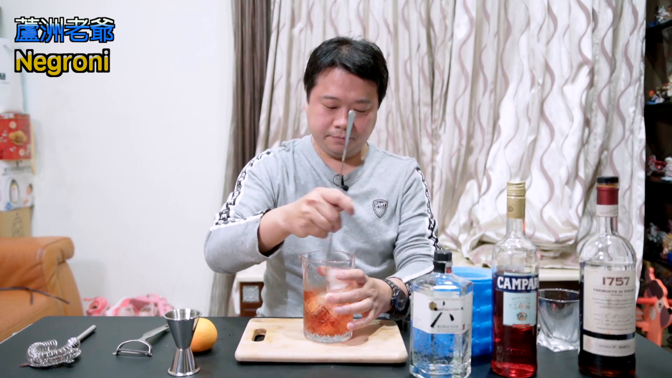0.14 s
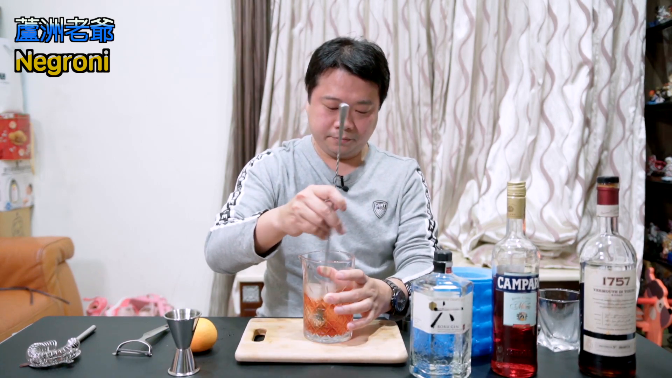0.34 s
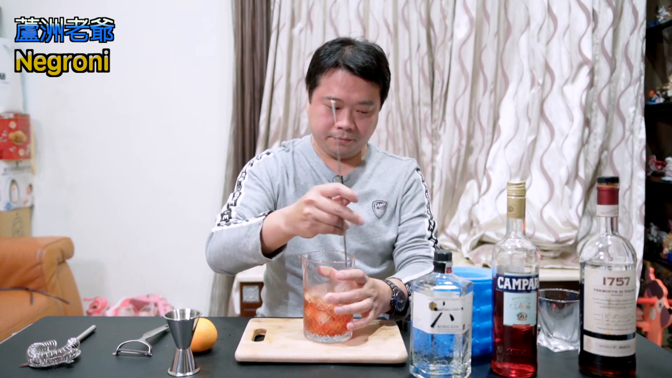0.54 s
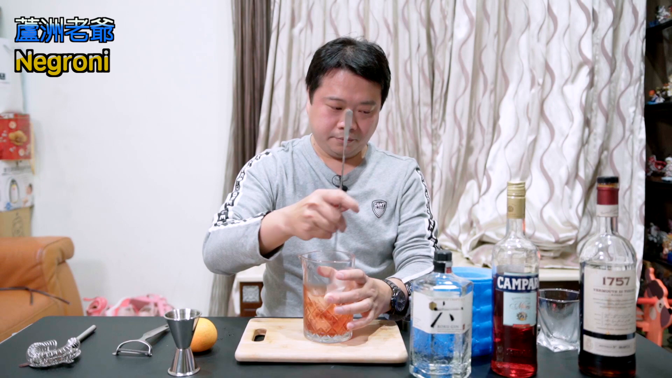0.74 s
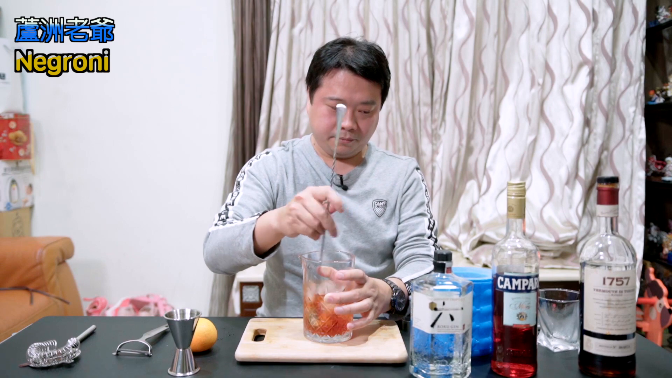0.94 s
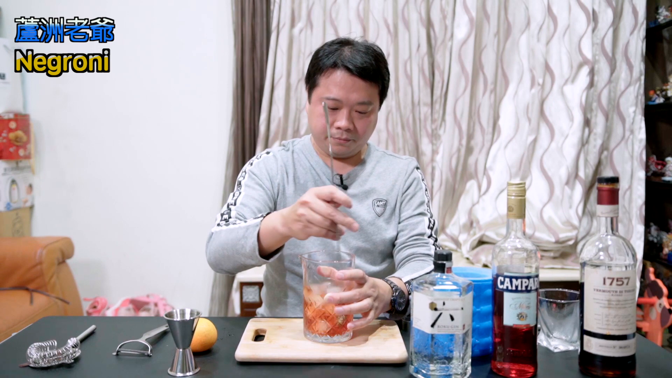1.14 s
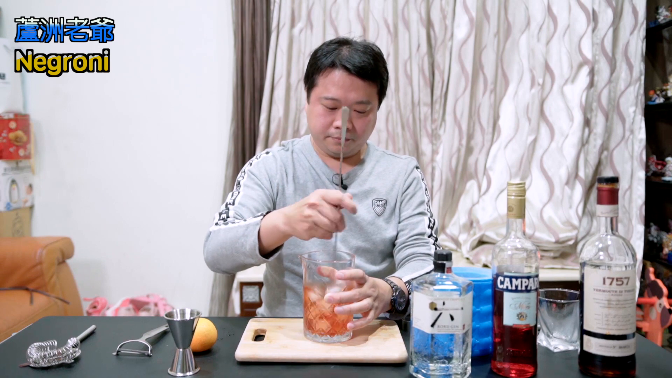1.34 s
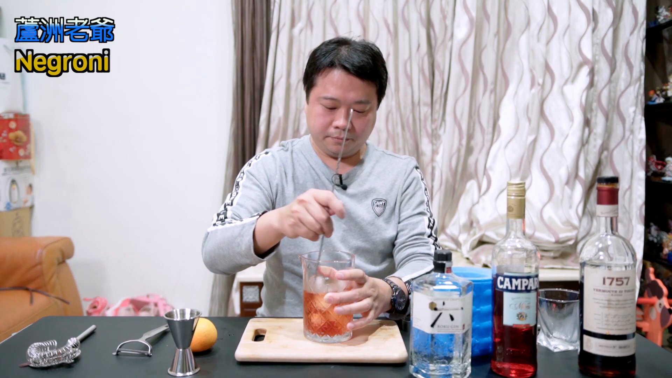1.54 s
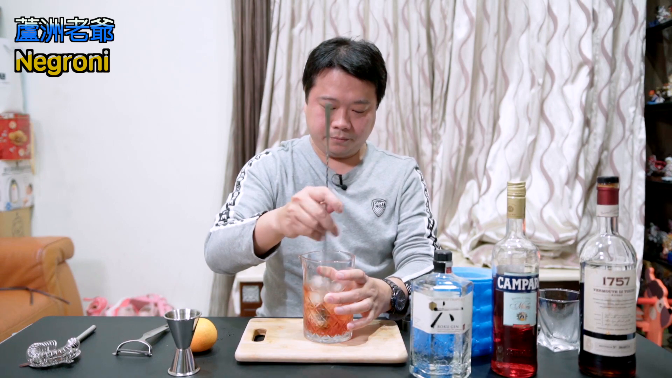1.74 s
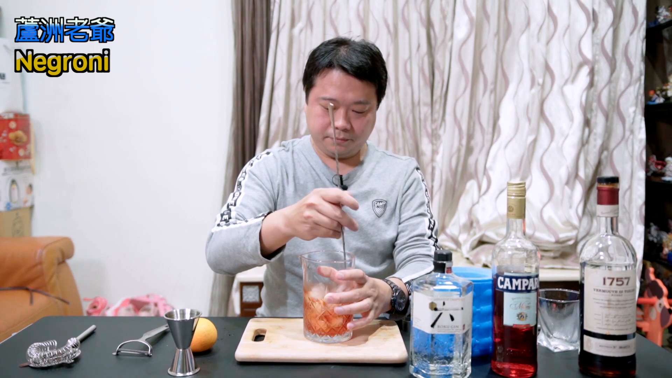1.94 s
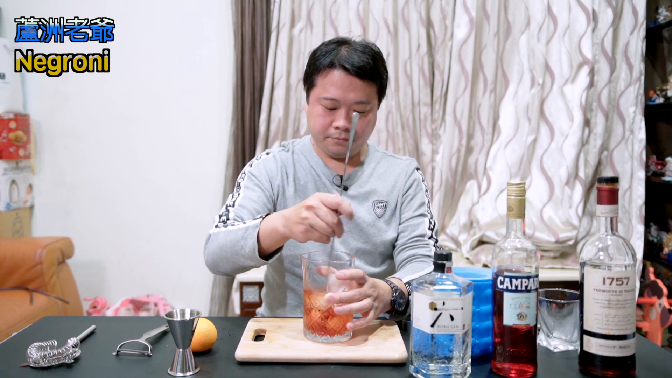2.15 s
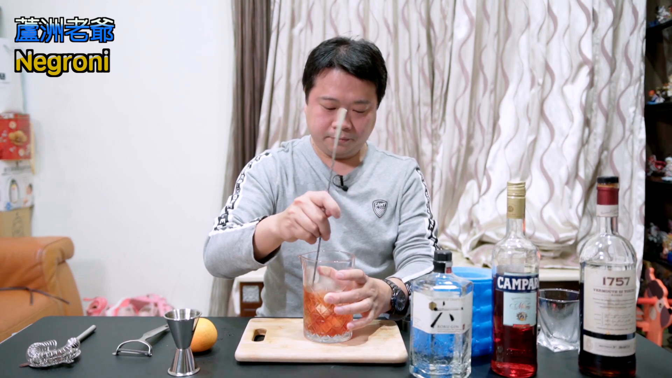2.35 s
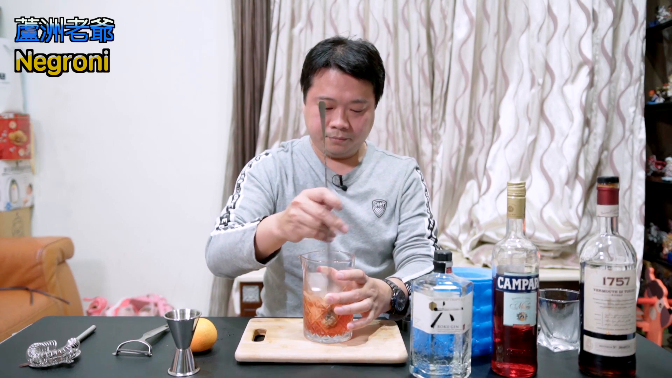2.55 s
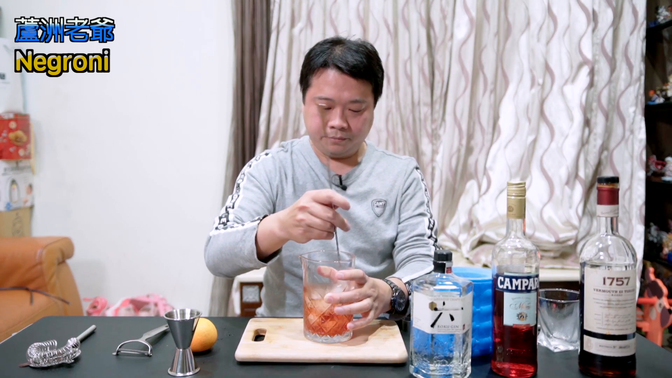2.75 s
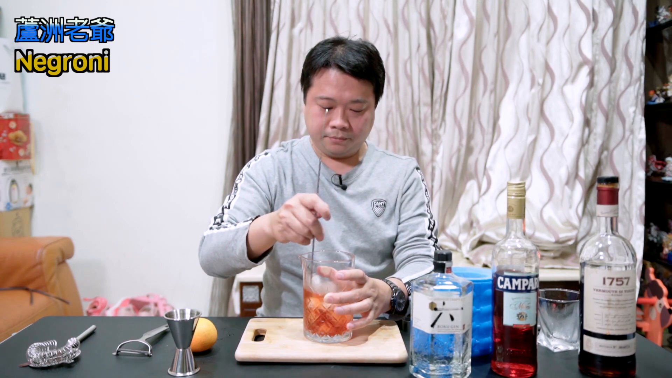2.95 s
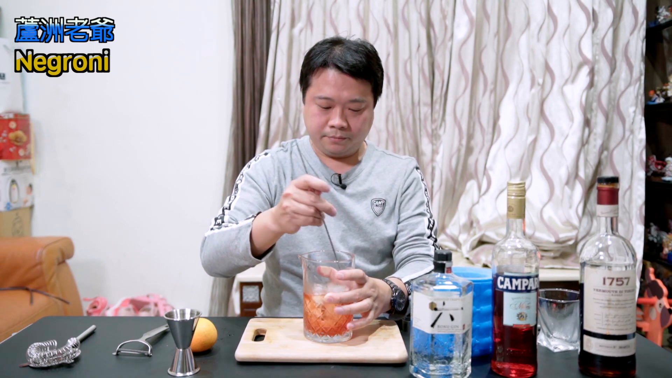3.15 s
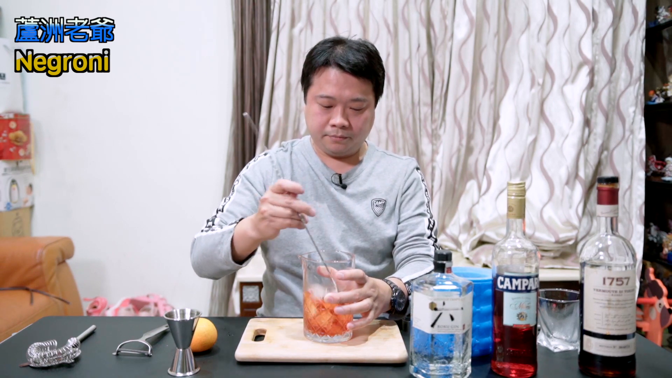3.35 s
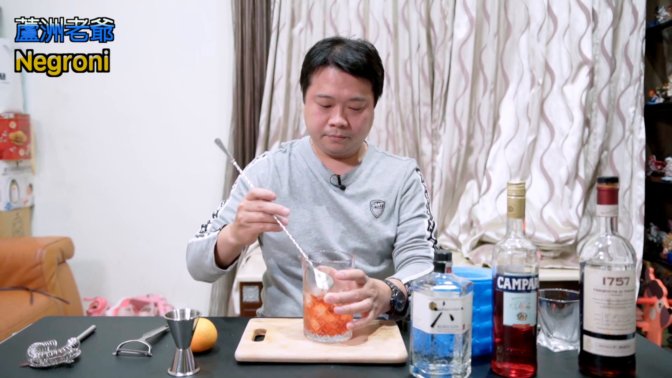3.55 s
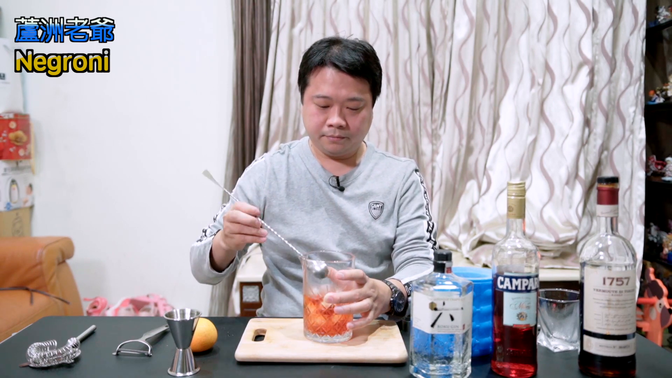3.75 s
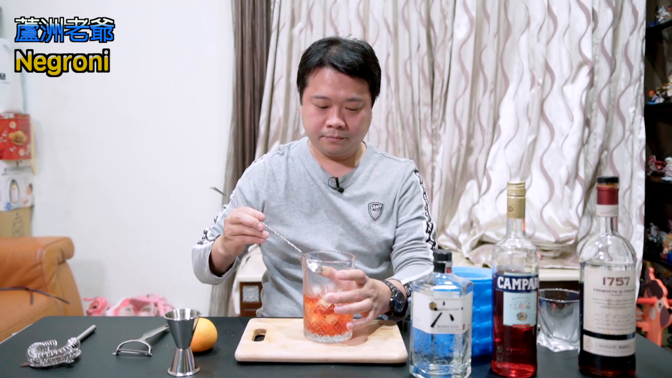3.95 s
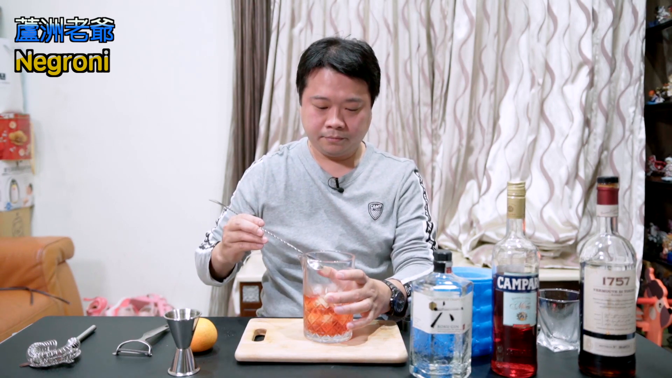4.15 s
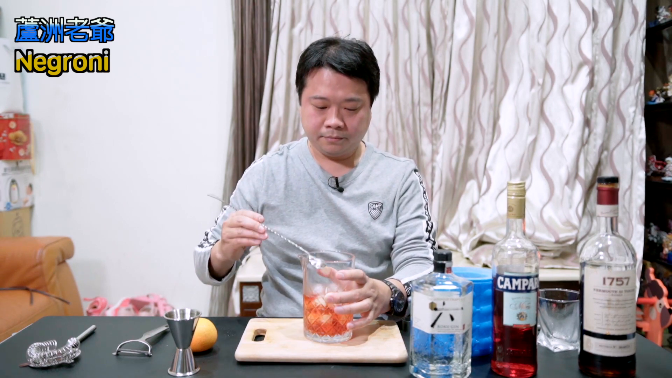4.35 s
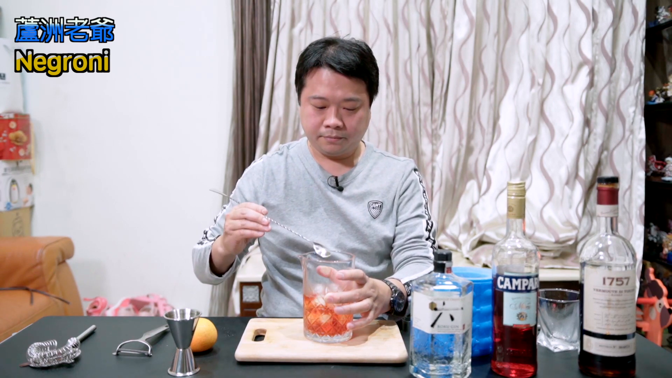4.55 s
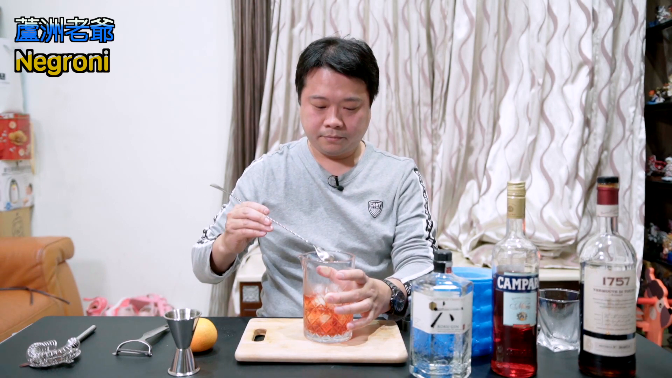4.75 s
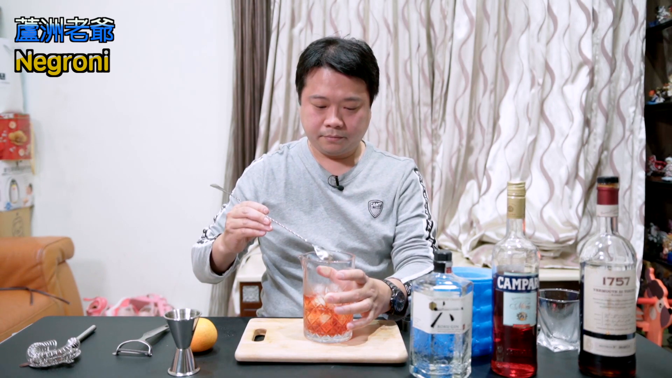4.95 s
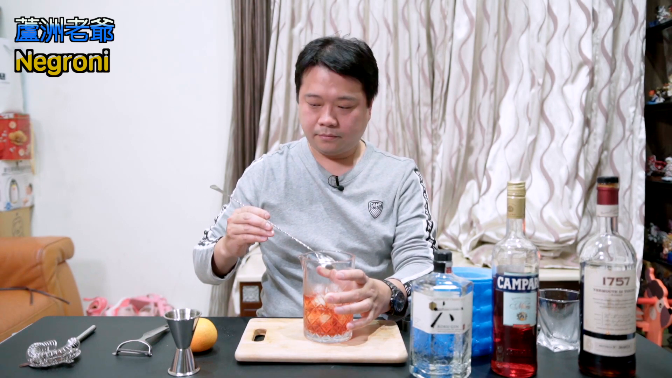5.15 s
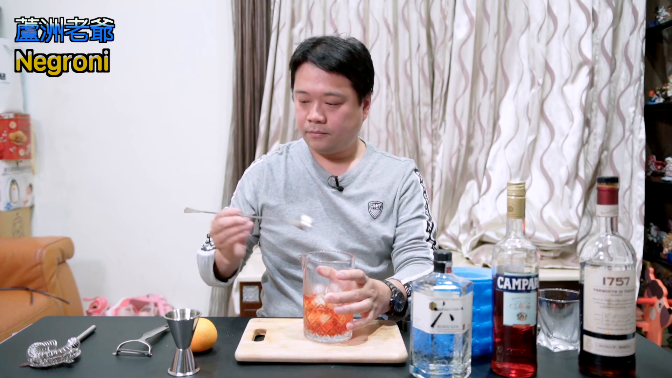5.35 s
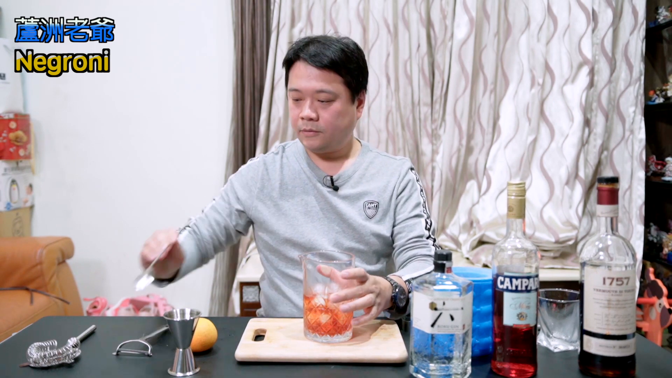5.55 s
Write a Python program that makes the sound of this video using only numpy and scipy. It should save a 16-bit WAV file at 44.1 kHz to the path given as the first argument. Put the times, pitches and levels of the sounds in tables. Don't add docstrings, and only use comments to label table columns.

```python
import sys
import numpy as np
from scipy import signal
from scipy.fft import rfft, irfft
from scipy.io import wavfile
from scipy.ndimage import uniform_filter1d

SR = 44100
rng = np.random.default_rng(int(sys.argv[2]) if len(sys.argv) > 2 else 0)


def amp(db):
    return 10 ** (np.asarray(db, float) / 20)


def write(x):
    x = np.atleast_2d(x).T
    wavfile.write(sys.argv[1], SR, np.round(np.clip(x, -1, 1) * 32767).astype(np.int16))


N = 246210
T = np.arange(N) / SR
SPLIT, SPLIT_DEPTH = 0.012, 0.5


def level(x, db):
    return x * amp(db) / np.sqrt(np.mean(x ** 2))


def colour(x, points):
    hz, db = np.transpose(points)
    f = np.maximum(np.arange(len(x) // 2 + 1) * SR / len(x), 1)
    return irfft(rfft(x) * amp(np.interp(np.log(f), np.log(hz), db)), len(x))


def band(x, lo_hz, hi_hz):
    return signal.sosfilt(signal.butter(3, [lo_hz, hi_hz], "bandpass", fs=SR, output="sos"), x)


def add(out, s, sound):
    i = max(int(s * SR), 0)
    out[i:i + len(sound)] += sound[:len(out) - i]


def decay(t, t60):
    return np.exp(-np.log(1000) * t / t60)


def glide_tone(hz):
    return np.sin(2 * np.pi * np.cumsum(hz) / SR)


def ring(modes, scatter_db, detune, chance, size=4000):
    hz, db, t60 = np.array(modes, float).T[:, :, None]
    t = T[:size]
    shift, strength = chance[:2 * len(modes)].reshape(2, -1, 1)
    waves = np.sin(2 * np.pi * hz * (1 + detune * shift) * t) * decay(t, t60)
    throb = np.sin(2 * np.pi * SPLIT * hz * (1 + 0.15 * strength) * t + 2 * shift)
    waves = waves * (1 + SPLIT_DEPTH * throb)
    return (amp(db + scatter_db * strength) * waves).sum(axis=0)


def crack(decay_s):
    return rng.standard_normal(4000) * np.exp(-T[:4000] / decay_s)


# (f/Hz, level/dB)
AIR_SPECTRUM = [(18, -39.5), (30, -5), (345, -7), (426, -13), (988, -16.5), (2400, -29), (12000, -37.5),
                (16000, -49)]


def air():
    steps = np.repeat(rng.standard_normal(N // 4000 + 1), 4000)[:N]
    drift_db = 1.1 * uniform_filter1d(steps, size=4000)
    hush = level(colour(rng.standard_normal(N), AIR_SPECTRUM), -66.5)
    whir = amp(-2) * band(hush, 2250, 2500)
    return (hush + whir) * amp(drift_db)


# (t/s, peak level/dB)
BUMPS = [(0.299, -69), (0.706, -61), (0.839, -65), (1.398, -76), (1.912, -53), (2.139, -58), (2.4, -53),
         (2.639, -49.5), (2.919, -53.5), (2.999, -62), (3.515, -51), (3.83, -56), (4.579, -66),
         (5.109, -66)]


def bumps():
    out = np.zeros(N)
    modes = [(46.3, -11.5, 0.05), (84.2, -3, 0.096), (149.5, -15, 0.15)]  # (f/Hz, level/dB, t60/s)
    swell = np.minimum(T[:4000] / 0.014, 1)
    for s, db in BUMPS:
        thump = ring(modes, 1.1, 0.08, rng.standard_normal(6))
        add(out, s, amp(db + 11.0) * thump * swell)
    return out


# (f/Hz, t60/s)
ROOM_T60 = [(300, 0.55), (2000, 0.35), (6000, 0.28), (15000, 0.16)]
# (delay t/s, level/dB)
ECHOES = [(.0023, -22.5), (.0065, -17), (0.013, -13.5), (0.027, -25)]


def room(x):
    t, tail = T[:20000], 0
    hz, t60 = np.transpose(ROOM_T60)
    for f in 180 * 2 ** np.arange(0, 6.6, 0.5):
        hiss = band(rng.standard_normal(len(t)), f / 1.19, f * 1.19)
        tail = tail + hiss * decay(t, np.interp(np.log(f), np.log(hz), t60))
    tail = tail * np.clip((t - 0.005) / 0.008, 0, 1)
    tail = amp(-10.5) * tail / np.sqrt(np.sum(tail ** 2))
    tail[0] = 1
    for late, db in ECHOES:
        tail[int(late * SR)] += amp(db)
    return signal.fftconvolve(x, tail)[:N]


# (t/s, low ring level/dB)
NUDGES = [(0.1175, -27.5), (0.147, -31), (0.2024, -37), (0.2563, -27.5), (0.279, -31), (0.404, -32),
          (0.555, -33), (0.9935, -39.5), (1.0324, -33), (1.0746, -52), (1.117, -31.5), (1.2792, -33),
          (1.3234, -30), (1.428, -51), (1.6304, -49), (1.741, -35), (1.787, -39), (2.113, -32.5),
          (2.1358, -32.5), (2.201, -30.5), (2.3893, -37), (2.9328, -25), (3.3873, -36)]


def nudges():
    return [(s, db, db - 28, db - 20.5, db - 20.5, db - 24, 0) for s, db in NUDGES]


# (t/s, cube level/dB, click level/dB, sharpness/dB: small cubes ring high, big ones thud)
CUBES = [(.1966, -31.5, -59, -4), (0.2075, -36, -46, -3), (.2559, -35, -62, 2), (.6085, -34, -48, 2),
         (.9928, -40.5, -71, -6), (1.0317, -36.5, -74, -5.5), (1.0742, -35.5, -50, -5.5),
         (1.1084, -49.5, -66, -18.5), (1.2005, -36.5, -50, -3), (1.2799, -35.5, -68, 0),
         (1.2901, -33.5, -76, -7), (1.3521, -34, -48.5, -4.5), (1.6315, -37.5, -53.5, -5),
         (1.6413, -35, -71, -0.5), (1.767, -40.5, -54, -2.5), (1.9184, -33.5, -50, -5.5),
         (1.949, -33.5, -44, 2), (2.1674, -30.5, -70, 5.5), (2.2359, -36, -50, 0), (2.3802, -37, -68, 11),
         (2.3994, -29.5, -38, -2.5), (2.4245, -46, -53, 14), (2.4884, -34, -43, 1), (2.602, -42.5, -63, 13),
         (2.673, -37.5, -39.5, 8), (2.7656, -38.5, -78, 13), (2.854, -38.5, -70, 0),
         (2.919, -25, -32, -6.5), (0.4133, -31.5, -41, 13)]


def cube_hits():
    return [(s, db - 23, db, db - 46, db - 46, click, sharp) for s, db, click, sharp in CUBES]


# (t/s, cube level/dB, high rings level/dB, height 0 at waist to 1 near lip)
PINCHES = [(0.098, -32, -34.5, 0.22), (0.1145, -40, -25.5, 0.55), (0.2812, -51, -37.5, 0.27),
           (0.3672, -35, -39, 0.14), (.4107, -53, -33, 0.55), (0.5522, -39, -26, 0.6),
           (.653, -36, -29.5, 0.39), (0.8414, -38.5, -42, 0.71), (0.8666, -36.5, -34.5, 0.47),
           (1.3034, -37, -29, 0.69), (1.4172, -34.5, -29.5, 0.17), (1.781, -51, -39.5, 0.052),
           (1.826, -53, -31, 0.42), (1.838, -39, -39, 0), (1.9287, -41, -38, 0.74),
           (1.9363, -55, -31, 0.52), (1.977, -40, -33, 0.2), (2.116, -49, -36.5, 1), (2.1299, -35, -33, 0),
           (2.1435, -35, -35, 0), (2.2229, -41, -34, 0.39), (2.3617, -31.5, -35, 0.36),
           (2.4579, -35.5, -50, 0.79), (2.4989, -30, -29, 0.57), (2.544, -32, -37, 0.6),
           (2.5624, -32.5, -42, 0.72), (3.156, -45.5, -45, 0.078), (3.256, -44, -33.5, 0.46),
           (3.3285, -45, -40, 0.3), (3.3848, -44, -40.5, 0.75)]


def pinches():
    rows = []
    for s, ice, high, up in PINCHES:
        mid_db, upper_db = 20 * np.log10(np.clip([1 - up, up], 0.05, 1))
        rows.append((s, high - 20, ice, high + mid_db, high + upper_db, high - 10.5, -1.5))
    return rows


# (t/s, then level/dB of low ring, cube, high rings, click)
BLOWS = [(.0055, -30, -47, -42.5, -72), (0.1387, -25.5, -23.5, -24.5, -31), (0.4178, -54, -27, -36, -36.5),
         (.428, -35, -24.5, -25, -30.5), (.458, -32.5, -42, -25.5, -40), (0.521, -27.5, -32.5, -30, -38.5),
         (0.596, -25.5, -50, -33.5, -42), (0.722, -43, -26, -50.5, -37), (0.7784, -41, -31, -43, -52),
         (1.2605, -34, -37.5, -32.5, -44.5), (1.542, -31.5, -33, -37.5, -52),
         (1.5673, -32.5, -38.5, -52, -52), (1.8516, -26, -31.5, -36, -42.5), (1.8923, -45, -36, -65, -50),
         (2.1029, -36, -35.5, -42, -40), (2.3156, -35.5, -43, -40.5, -60), (2.4443, -32, -35, -31.5, -45),
         (2.5834, -39, -35.5, -45, -64), (2.6337, -35, -35, -41, -40.5),
         (2.644, -34.5, -23.5, -44.5, -29.5), (2.659, -39, -40, -34, -50), (2.752, -40, -28, -35, -48),
         (3.1036, -32, -47, -57, -54), (3.2475, -37, -33.5, -31.5, -35)]


def blows():
    return [(s, low, ice, high, high - 5.5, click, 0.38 * (high - low))
            for s, low, ice, high, click in BLOWS]


def contacts():
    return blows() + pinches() + cube_hits() + nudges()


def jostle():
    push = np.zeros(N)
    for s, *db, _ in contacts():
        push[int(s * SR)] += np.sum(amp(np.array(db)) ** 2)
    settle = np.exp(-T[:12000] / 0.01) + amp(-30.0) * np.exp(-T[:12000] / 0.058)
    return np.abs(signal.fftconvolve(push, settle)[:N]) ** 0.37


def fizz():
    per_s, length_s = 70, 0.01
    out, t = np.zeros(N), T[:int(length_s * SR)]
    swell = np.sin(np.pi * (t / length_s) ** 0.3)
    for when, size, glide, db in rng.random((int(per_s * N / SR), 4)):
        start_hz = 813 * 2 ** (2.5 * size)
        hz = start_hz * (1 + (0.5 * glide - 0.12) * t / length_s)
        add(out, when * T[-1], amp(-14 * db) * glide_tone(hz) * swell)
    return amp(-21) * jostle() * out


# (t/s, peak level/dB, start f/Hz, end f/Hz, length t/s)
BUBBLES = [
    (0.164, -31, 1930, 2050, 0.0064),
    (1.325, -32.5, 1003, 1490, 0.019),
    (1.348, -38.5, 1780, 3220, 0.0068),
    (1.418, -36, 1410, 1830, 0.0139),
    (1.438, -44, 2230, 3600, 0.007),
    (2.553, -35, 3010, 2740, 0.021),
    (4.948, -76, 2630, 2750, 0.02),
]


def bubbles():
    out = np.zeros(N)
    for s, db, start_hz, end_hz, length in BUBBLES:
        t = T[:int(1.5 * length * SR)]
        hz = start_hz * (end_hz / start_hz) ** (t / length)
        add(out, s, amp(db) * glide_tone(hz) * np.sin(np.pi * (t / t[-1]) ** 0.41))
    return out


# (t/s, peak level/dB, f/Hz)
GULPS = [(0.104, -40, 1360), (0.138, -30, 835), (0.254, -31, 810), (0.28, -46, 923), (0.367, -41, 840),
         (0.417, -42, 845), (0.425, -33, 930), (0.506, -40, 895), (0.553, -42, 790), (0.609, -33, 794),
         (0.722, -22, 1220), (0.778, -32, 907), (0.938, -35.5, 880), (1.108, -33, 776), (1.279, -45, 1210),
         (1.291, -39, 915), (1.325, -21.5, 1155), (1.418, -37, 1400), (1.543, -37, 1300),
         (1.631, -38, 1300), (1.807, -43, 1370), (1.85, -32, 1080), (1.892, -39, 1220), (1.919, -26.5, 857),
         (2.167, -28.5, 877), (2.366, -36, 813), (2.398, -25, 1410), (2.444, -45, 902), (2.49, -30, 700),
         (2.63, -36, 1240), (2.644, -38, 786), (2.753, -35.5, 790), (2.855, -27.5, 960), (2.919, -21, 1230),
         (3.249, -27.5, 1360), (3.384, -48, 1410)]


def gulps():
    out, t = np.zeros(N), T[:SR // 6]
    for s, db, hz in GULPS:
        tone = np.sin(2 * np.pi * hz * t * (1 + 2.56 * t))
        add(out, s, amp(db - 5) * tone * decay(t, 21 / hz) * np.minimum(t / 0.0012, 1))
    return out


# (t/s, slosh level/dB)
SWIRL = [(0, -48), (.12, -63), (.5, -71), (1.0, -56.5), (1.4, -75), (1.749, -55.5), (2.15, -54.5),
         (2.35, -72), (3.0, -55.5), (3.25, -73), (3.5, -54.5), (3.75, -53), (3.95, -59.5), (4.1, -91)]
# (f/Hz, level/dB)
GRIT_SPECTRUM = [(180, -54), (300, -13.5), (1480, -5), (1640, -0.5), (2250, -7), (4090, -10), (11100, -31),
                 (16000, -39)]
# (f/Hz, level/dB, t60/s)
LOW_RING = [(1622, -5, 0.045), (1657, -3, 0.075)]
MID_RING = [(4086, 0, 0.034), (4070, -4, 0.08), (4352, -5, 0.026)]
UPPER_RING = [(4807, -2.5, 0.06), (4910, -8.5, 0.054)]
ICE_BODY = [(2050, -7, 0.017), (2480, -0.5, 0.019), (2648, 1.5, 0.033), (3080, -8.5, 0.016),
            (3634, -8.5, 0.053)]
ICE_THUD = [(200.3, -10.5, 0.042), (795, -13, 0.019), (877, 6, 0.014), (1070, -1.5, 0.01),
            (1288, 0.5, 0.013)]


def chatter():
    when, how_big, sign, when_grit = rng.random((4, N))
    size = amp(np.minimum(-3.5 * np.log(1 - how_big), 12)) * np.sign(sign - 0.5)
    ticks = (when < 350 / SR) * size
    families = [(LOW_RING, 0), (MID_RING, -10.5), (UPPER_RING, -12.5), (ICE_BODY, -7.5), (ICE_THUD, -8.5)]
    glass = 0
    for k, (family, db) in enumerate(families):
        own_ticks = np.roll(ticks, 9973 * k)
        murmur = signal.fftconvolve(own_ticks, ring(family, 0, 0, np.zeros(12)))[:N]
        glass = glass + level(murmur, db)
    grains = (when_grit < 380 / SR) * abs(size)
    bursts = signal.fftconvolve(grains, np.exp(-T[:800] / 0.0018))[:N]
    grit = level(colour(bursts * rng.standard_normal(N), GRIT_SPECTRUM), -2.2)
    slosh = colour(rng.standard_normal(N), [(80, -19.5), (180, -3.0), (330, 9.0), (550, 1.0), (900, -8.0),
                                            (1300, -26.5), (2600, -76.5)])
    s, slosh_db = np.transpose(SWIRL)
    swirl = amp(np.interp(T, s, slosh_db, right=-120))
    return amp(-19.0) * jostle() * (glass + grit) + swirl * level(slosh, 0.29)


# (t/s, peak level/dB, f/Hz)
CUBE_PINGS = [(0.0982, -35, 3100), (0.1136, -31, 2430), (0.1386, -23, 2640), (0.1665, -28.5, 1930),
              (0.185, -27, 2090), (0.2548, -32, 2720), (0.3676, -38, 2620), (0.388, -36, 2670),
              (0.4118, -27, 3400), (0.4194, -20, 2610), (0.4584, -26, 3390), (0.5222, -31, 2500),
              (0.5531, -31, 2720), (0.595, -29, 3730), (0.6404, -39, 1870), (0.6529, -27.5, 3660),
              (0.7228, -34, 2380), (0.7791, -30, 1950), (0.841, -42, 2680), (0.8679, -39, 2650),
              (0.9926, -47, 2380), (1.0326, -37, 2400), (1.075, -39, 2040), (1.1997, -38, 3650),
              (1.258, -33, 2470), (1.2605, -32, 3900), (1.295, -28.5, 2650), (1.3244, -37, 2110),
              (1.3523, -28, 2690), (1.4177, -33, 2570), (1.5065, -39, 2590), (1.5434, -33, 3200),
              (1.6327, -33, 2690), (1.8382, -31, 2580), (1.8522, -30, 2730), (1.9185, -38, 2490),
              (1.936, -30, 2710), (2.0752, -51, 3260), (2.1291, -42, 1940), (2.1291, -28, 2500),
              (2.1685, -25, 2440), (2.2817, -35, 2630), (2.3201, -36, 2730), (2.3466, -33, 3210),
              (2.3615, -39, 3470), (2.383, -28, 2800), (2.3999, -26, 2670), (2.4443, -32, 2630),
              (2.4977, -45, 2660), (2.5451, -31, 2820), (2.6434, -36, 2500), (2.6434, -23, 2050),
              (2.7526, -31, 2640), (2.8539, -49, 2060), (2.9193, -29, 2100), (3.1577, -36, 3920),
              (3.247, -46, 2520), (3.3842, -48, 2438)]


def cube_pings():
    out, t = np.zeros(N), T[:SR // 6]
    snap = band(1. * (t == 0), 900, 7000)
    snap = amp(-14) * snap / abs(snap).max()
    for s, db, hz in CUBE_PINGS:
        tone = np.sin(2 * np.pi * hz * t) * decay(t, 72 / hz) * np.minimum(t / 0.00048, 1)
        add(out, s, amp(db - 3.5) * (tone + snap))
    return out


# (t/s, peak level/dB)
TOUCHES = [(0.3887, -40), (0.403, -27), (0.939, -40), (1.0228, -39), (1.25, -36.5), (1.3896, -44),
           (1.506, -38), (1.807, -33), (2.074, -37), (2.088, -31), (2.3452, -38), (2.8066, -34),
           (2.9022, -41), (3.0853, -32), (3.4233, -53)]
# (f/Hz, level/dB, t60/s)
TOP_RING = [(5782, 8.5, 0.035), (7090, 1.5, 0.035), (8420, 2, 0.017), (10900, -21, 0.016)]


def knocks():
    deep, dull, bright, rings = np.zeros((4, N))
    rise = np.minimum(T[:4000] / 0.00099, 1)
    light = [(s, db - 6, db - 8.5, db - 26, db - 13.5, db - 21.0, 0) for s, db in TOUCHES]
    for s, low_db, ice_db, mid_db, upper_db, click_db, sharp_db in contacts() + light:
        c = rng.standard_normal((6, 12))
        burst = crack(0.0028) * rise
        add(deep, s, amp(ice_db - sharp_db) * burst)
        add(dull, s, amp(ice_db + sharp_db / 2) * burst)
        add(bright, s, amp(click_db) * burst)
        glass = amp(low_db - 7.0) * ring(LOW_RING, 2.6, 0.007, c[0])
        glass += amp(mid_db - 5.5) * ring(MID_RING, 3.4, 0.019, c[1] * 0.7)
        glass += amp(upper_db - 3.5) * ring(UPPER_RING, 2.54, 0.01, c[2])
        glass += amp(click_db - 13) * ring(TOP_RING, 4.6, 0.022, c[3])
        ice = amp(sharp_db / 2 - 11.5) * ring(ICE_BODY, 5.5, 0.054, c[4])
        ice += amp(-15.0 - sharp_db) * ring(ICE_THUD, 4.1, 0.037, c[5])
        add(rings, s, rise * (glass + amp(ice_db) * ice))
    thud = band(deep, 710, 1750) + band(dull, 1560, 4020)
    return rings + amp(8.5) * thud + amp(3.0) * band(bright, 5100, 11700)


# (t/s, level/dB, f/Hz, t60/s)
SINGLE_TONES = [(3.486, -31.5, 1640, 0.06), (3.484, -36.5, 3000, 0.0096), (3.486, -42, 3900, 0.015),
                (3.512, -33, 4200, 0.027), (3.528, -34, 4300, 0.028), (3.531, -39.5, 1090, 0.028),
                (3.569, -24.5, 4150, 0.054), (3.57, -39.5, 1660, .03), (3.584, -37, 4600, 0.034),
                (3.499, -31, 1070, .045), (3.712, -36, 4270, 0.11), (3.712, -36.5, 5000, 0.056),
                (3.712, -40, 11270, 0.038), (3.698, -36, 7350, 0.08), (3.83, -37.5, 8070, 0.05),
                (3.829, -32.5, 1900, 0.032), (3.842, -28, 7180, 0.031), (3.843, -27.5, 4111, 0.058),
                (3.853, -29, 4105, 0.12), (3.895, -42.5, 7180, 0.11), (5.197, -51, 1664, 0.22),
                (3.89, -38, 1650, 0.22), (3.843, -38.5, 2520, 0.059), (3.866, -45, 4890, 0.16),
                (5.166, -36.5, 1090, 0.014), (5.166, -43, 803, 0.012), (5.176, -50, 5750, .12),
                (5.17, -49, 1618, .28), (5.178, -51, 5950, .1), (5.168, -41.5, 7074, .13),
                (5.175, -44.5, 4102, 0.15), (5.176, -51, 5300, .04), (5.166, -52, 6050, .05),
                (3.829, -33, 1050, 0.02), (3.829, -39, 9030, 0.071), (3.843, -37.5, 5500, .05),
                (.4205, -22, 2900, 0.017), (.43, -19, 2500, .02), (.272, -38, 2700, .025), (.568, -38, 2650, .03),
                (2.815, -37.5, 900, .05), (2.902, -41, 4100, .03), (2.662, -32, 2050, .025),
                (2.675, -32, 2300, .02), (3.262, -38.5, 1380, 0.034), (1.167, -39, 4100, 0.03),
                (3.793, -52, 1650, .05), (.459, -28, 4100, .03), (2.283, -39, 3700, 0.01),
                (1.487, -34, 1000, 0.0095)]


def single_tones():
    out, t = np.zeros(N), T[:SR // 6]
    for s, db, hz, t60 in SINGLE_TONES:
        throb = 1 + SPLIT_DEPTH * np.cos(2 * np.pi * SPLIT * hz * t)
        tone = np.sin(2 * np.pi * hz * t) * decay(t, t60) * np.minimum(t / 0.0012, 1)
        add(out, s, amp(db) * tone * throb)
    return out


# (t/s, peak level/dB, tick level/dB)
TAPS = [
    [(3.4985, -18.5, -21)],
    [(3.529, -62.5, -42), (3.561, -20, -12)],
    [(3.4845, -47, -43), (3.697, -25.5, -23), (3.712, -40.5, -34)],
    [(3.828, -9.5, -19)],
    [(5.165, -35.5, -28)],
]
# (f/Hz, t60/s, level/dB at
TAP_MODES = [(1089, 0.043, -11, -10.5, -35.5, -31.5, -24), (1620, 0.12, -21, -16, -11, -17.5, -10.5),
             (1664, 0.15, -20.5, -15, -12, -17.5, -9), (2426, 0.036, -20.5, -19, -22, -24.5, -33),
             (2985, 0.039, -22, -12.5, -23, -26.5, -27), (4081, 0.022, -1.5, -2, -13, -11, -26),
             (4103, 0.044, -2, -3, -18, -3.5, -33), (4165, .11, -24.5, -22.5, -17.5, -20.5, -13.5),
             (4226, .03, 0.5, -1.5, -15, -18.5, -33), (4570, 0.028, -6, -4, -16, -21, -21),
             (4870, 0.05, -10.5, -14.5, -8.5, -22.5, -10), (5790, 0.055, -18, -20, -15, -26.5, -16),
             (5940, 0.036, -11.5, -16.5, -18.5, -27, -16), (6350, 0.034, -19, -17, -18, -17.5, -21),
             (7150, 0.038, -21, -16.5, -20, -14, 4), (7350, 0.11, -18.5, -8.5, -15.5, -24.5, -13),
         (9080, 0.043, -14.5, -16, -19, -30, -32), (8560, .03, -15.5, -21, -25, -28.5, -26),
         (10900, 0.025, -12, -7.5, -21, -34.5, -9), (11260, 0.03, -10, -15, -15, -24, -15),
         (12800, .03, -22, -24.5, -17, -33.5, -29), (14500, .03, -29.5, -24, -16, -41.5, -33),
         (15360, .03, -25, -15, -34, -20.5, -28)]
BLOOM_S = [.001, 0.00099, 0.0011, 0.026, 0.0033]
# (t/s, level/dB)
SPOON_TICK = [
    (5.546, -51),
]


def taps():
    out, t = np.zeros(N), T[:SR // 4]
    for place, hits in enumerate(TAPS):
        modes = [(hz, db[place], t60) for hz, t60, *db in TAP_MODES]
        bloom = np.minimum(t / BLOOM_S[place], 1)
        for s, db, tick_db in hits:
            c = rng.standard_normal((2, 2 * len(modes)))
            low = ring(modes[:3], 0.56, 0.0011, c[0], size=len(t)) * bloom
            high = ring(modes[3:], 0.6, 0.0012, c[1], size=len(t))
            hit = amp(db) * (low + high)
            tick = crack(0.0022)
            hit[:len(tick)] += amp(tick_db) * band(tick, 700, 12000)
            add(out, s, hit * np.minimum(t / 0.0012, 1))
    for s, db in SPOON_TICK:
        add(out, s, amp(db) * band(crack(0.002), 1300, 5200))
    return out


def scene():
    strikes = knocks() + taps() + bubbles() + cube_pings() + gulps() + single_tones()
    at_glass = amp(-1.5) * strikes + amp(-5.5) * chatter() + fizz()
    return (room(at_glass) + bumps() + air())[None]


def roll_off(x):
    return signal.sosfilt(signal.butter(12, 16670, fs=SR, output="sos"), x)


def record(dry):
    squash = 2.0
    rounded = np.tanh(squash * dry) / squash
    no_rumble = signal.sosfilt(signal.butter(2, 40, "highpass", fs=SR, output="sos"), rounded)
    mix = signal.sosfilt(signal.ellip(8, 0.2, 70, 15900, fs=SR, output="sos"), no_rumble)
    return roll_off(mix)


dry = scene()
out = record(dry)
write(out)
```